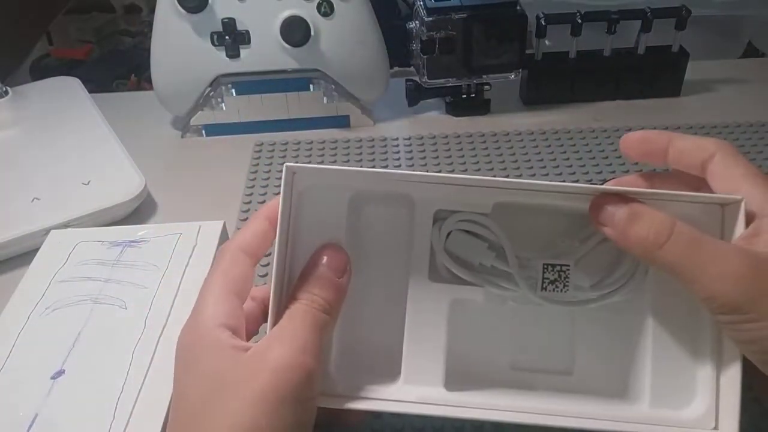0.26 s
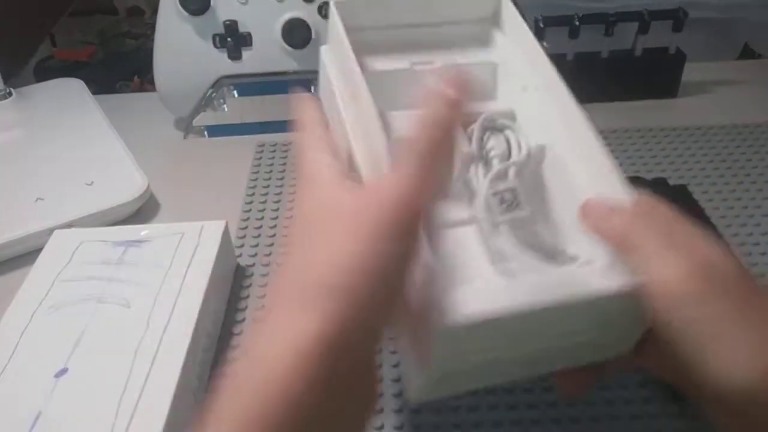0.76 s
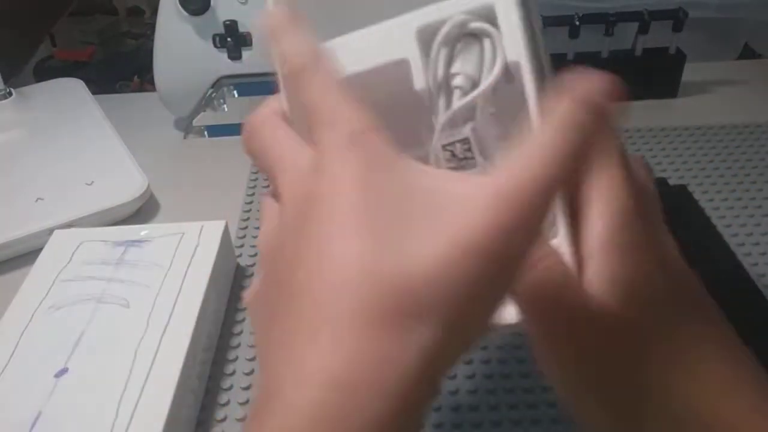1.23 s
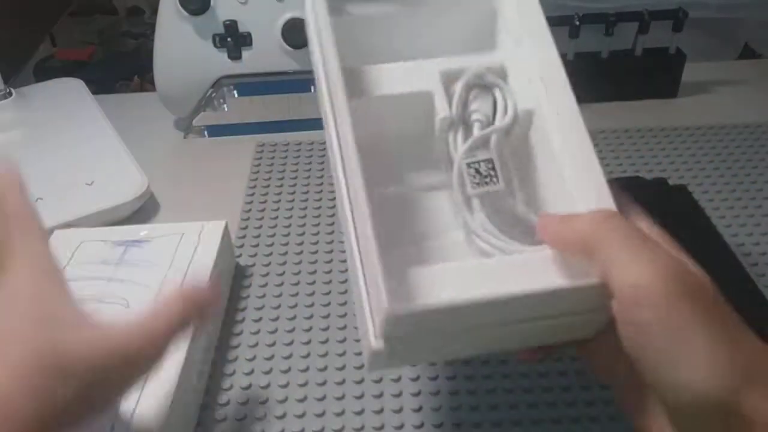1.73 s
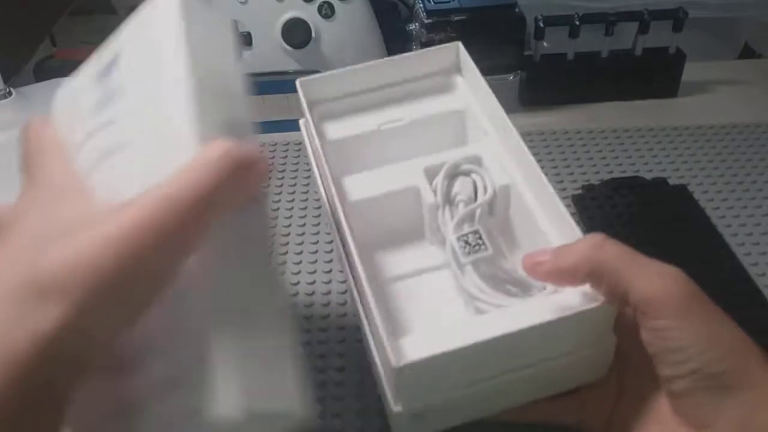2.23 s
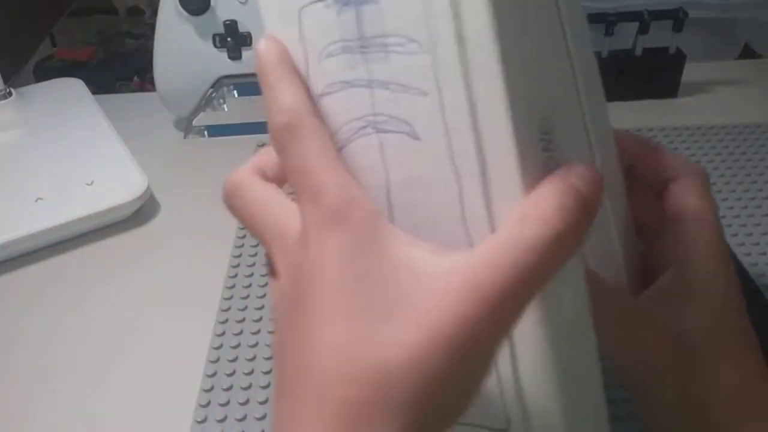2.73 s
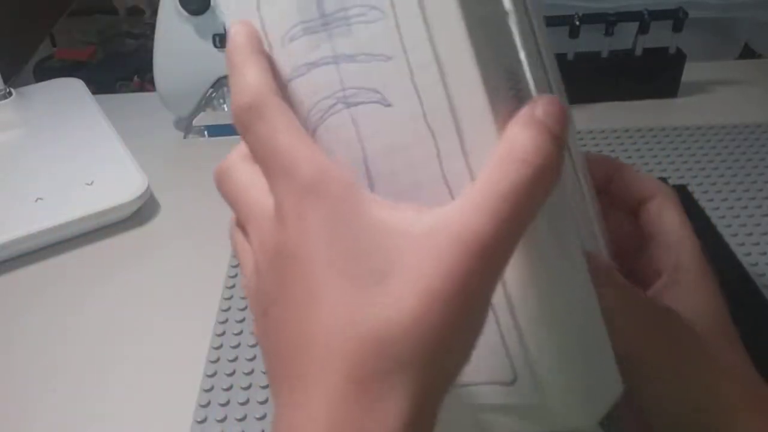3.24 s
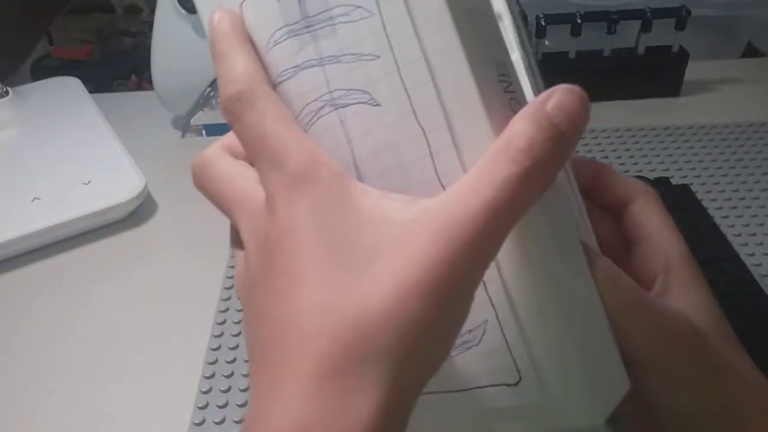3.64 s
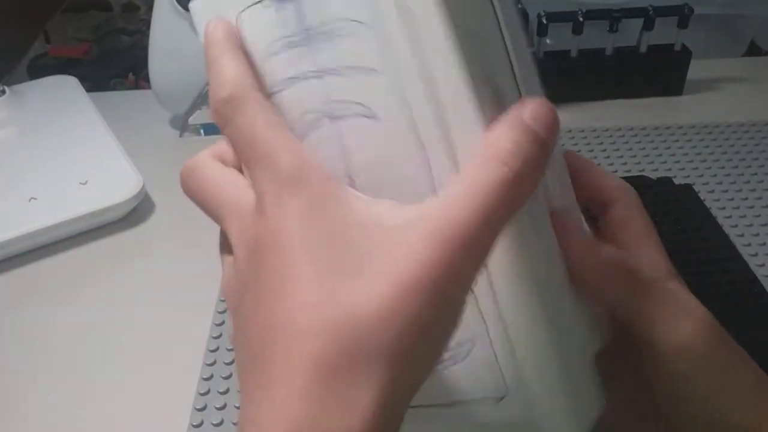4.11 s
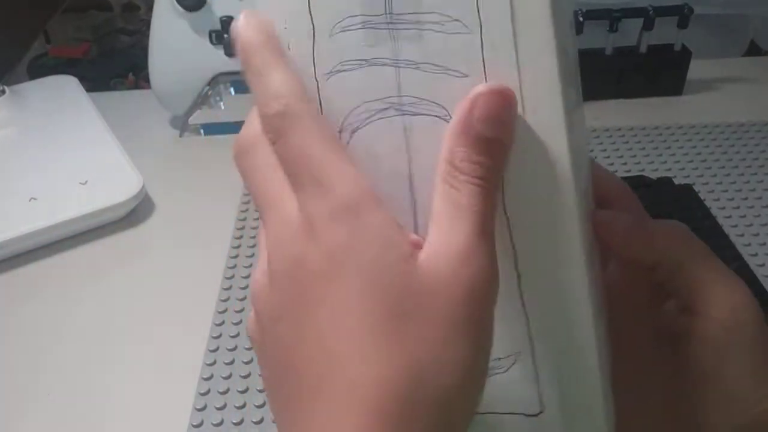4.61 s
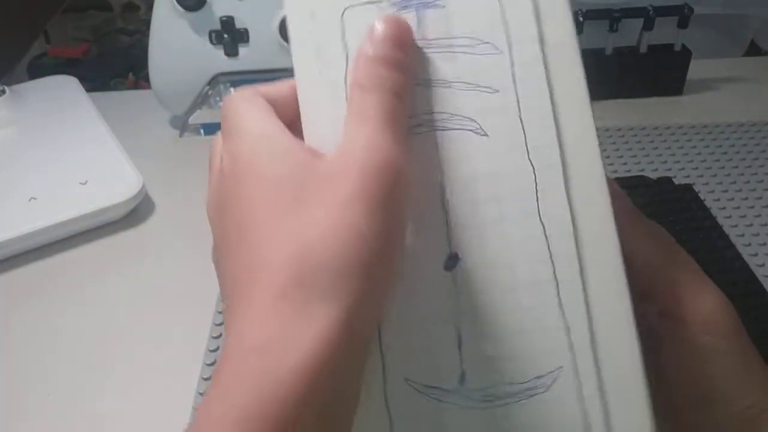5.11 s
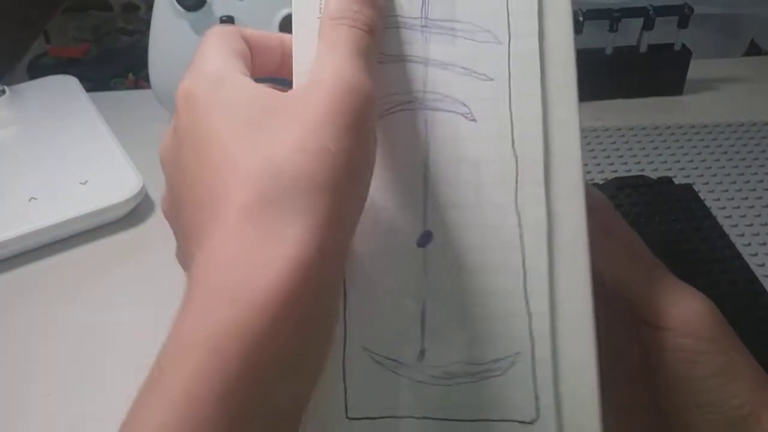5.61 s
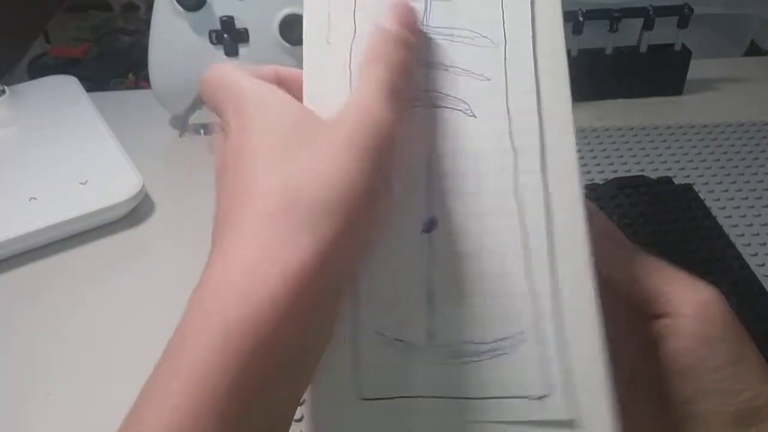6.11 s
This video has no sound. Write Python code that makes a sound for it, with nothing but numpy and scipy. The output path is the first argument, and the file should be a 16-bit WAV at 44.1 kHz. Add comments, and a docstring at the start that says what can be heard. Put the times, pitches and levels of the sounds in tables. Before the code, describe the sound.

Fingers brush and shift a rigid card box, heard closely and fairly dry indoors. Soft low bumps and papery rasps come first, then a firm hollow clunk on the table. A lull of light handling leads to clicky, woody lid knocks, brightest just before and after four seconds. Finally the snug lid rubs in muffled strokes with tiny crackles, its knocks getting lower in pitch, over a faint steady room tone.

```python
"""A faint low shudder, a soft thud and a tick are heard first, as hands turn a stiff cardboard box over.
They set it on a table and fit its lid, close by in a small room. Thuds, knocks and lid slips are struck modes:
sums of dying sines. Ticks and cracks are coloured noise bursts, and a squeak is a brief stick-slip oscillation.
Sliding skin and card are friction noise, filtered into hiss, rasp and drone.
The walls' ring drops in pitch as the lid sinks; still air lies beneath."""
import sys
import numpy as np
from scipy import signal
from scipy.io import wavfile
from scipy.ndimage import uniform_filter1d

SR = 44100
rng = np.random.default_rng(int(sys.argv[2]) if len(sys.argv) > 2 else 0)


def output_pcm(signal):
    """Save a mono or channel-first signal as 16-bit PCM at the path in sys.argv[1].

    Samples are clipped to [-1, 1] before scaling.
    """
    pcm = np.clip(np.atleast_2d(signal).T, -1, 1) * 32767
    wavfile.write(sys.argv[1], SR, np.round(pcm).astype(np.int16))


N = 280075
T = np.arange(SR // 4) / SR  # time axis of one short sound [s]

# Knocks on the box: (time [s], wall level [dB], hollow re wall [dB], crack re wall [dB])
KNOCK_EVENTS = [(0.457, -57, 7, -6), (1.0281, -64.5, 5, 13.5), (1.8604, -38, 1.5, -12.5),
                (1.872, -44, 4, -13), (1.953, -36, 0, -4.5), (1.967, -51, 15, -10), (2.863, -37, -5.5, -7),
                (2.8826, -49.5, -5.5, -19), (3.1645, -47.5, -13, -14), (3.298, -50, -20, -18),
                (3.316, -40.5, -6, -27), (3.8705, -36.5, -32, -1), (3.8972, -29, -6, -9),
                (3.908, -38, -4, -3), (3.9201, -36.5, -8, 0), (4.1801, -27, -2, -7.5),
                (4.258, -42.5, -5, -14), (4.2897, -45.5, 5.5, -7.5), (4.3384, -44, 4.5, -4.5),
                (4.4, -37.5, -8, -3), (4.757, -56, -8, -23), (4.884, -46.5, -27, -14),
                (4.904, -50, -28, -20), (5.111, -58.5, -29, -10), (5.323, -61.5, -11, -3),
                (5.538, -60.5, 8.5, -3), (5.7377, -43, -8, -9), (5.75, -42.5, -7, -15),
                (5.861, -51, -3, -1), (5.952, -48, 3, -17), (6.001, -53.5, 6, -3.5), (6.257, -43.5, -9, -5),
                (6.2882, -32.5, 0, -8)]
# Modes of the walls: (multiple of wall pitch [1], level [dB], undamped t60 [s])
WALL_MODES = [(.62, -1, 0.04), (.78, -1.5, 0.045), (.89, 3, 0.028), (1.0, 9.5, 0.09), (1.12, -7, .03),
              (1.56, -15, 0.052), (1.78, -20.5, 0.062)]
# Modes of the hollow: (multiple of hollow pitch [1], level [dB], undamped t60 [s])
HOLLOW_MODES = [(1.0, 0.5, 0.074), (1.32, 5, 0.009), (1.84, -5.5, 0.055)]
# Pitches of the box as the lid goes on and sinks: (time [s], wall pitch [Hz], hollow pitch [Hz])
BOX_PITCHES = [(1.86, 769, 312), (1.96, 730, 342), (2.86, 764, 264), (4.18, 754, 254), (4.26, 648, 254),
               (5.5, 587, 260), (5.95, 467, 249), (6.29, 440, 365.6)]
# Damping of a knock by the grip: (time [s], ring time factor [1])
GRIP_DAMPING = [(1.86, 0.87), (4.18, 0.68), (6.29, 0.73)]
# Spectrum of a crack: (frequency [Hz], level [dB])
CRACK_SPECTRUM = [(300, -22), (800, 7.5), (1200, 2.5), (1550, -1.5), (1800, -7.5), (2400, -6.5),
                  (3500, -19.5), (6600, -20), (8500, -29), (16000, -60)]

# Bumps of the box on the table or the palm: (time [s], level [dB], pitch [Hz])
THUD_EVENTS = [(0.127, -49.5, 159), (0.179, -48.5, 95), (0.456, -38.5, 126.4), (0.492, -37, 123),
               (1.031, -50, 141), (1.547, -47.5, 151), (1.614, -53, 107), (1.864, -34, 137),
               (1.955, -41, 115), (1.968, -32.5, 209), (2.159, -44, 131), (5.753, -48, 165),
               (5.863, -51, 126), (6.28, -35.5, 196)]
# Modes of the box on the table: (multiple of thud pitch [1], level [dB], t60 [s])
TABLE_MODES = [(.52, -23, 0.18), (.92, -3.5, 0.091), (1.05, 0.5, 0.044), (1.6, -7, 0.066),
               (2.4, -15, 0.035)]
# Drags of the shuddering box: (fastest time [s], speeding up [s], slowing down [s], level [dB])
DRAG_EVENTS = [(.03, 0.023, 0.12, -57), (.52, 0.2, 0.12, -51.5), (1.985, 0.017, 0.12, -66),
               (4.64, 0.37, 0.2, -66.5)]
# Spectrum of the dragged box: (frequency [Hz], level [dB])
SHUDDER_SPECTRUM = [(25, -14), (45, -10), (62, 2), (90, -18), (140, -3), (200, -12), (320, -27), (800, -39)]

# Catches of card edges and fingernails: (time [s], level [dB], pitch [Hz])
TICK_EVENTS = [(0.1216, -60.5, 7000), (0.447, -58, 3160), (0.495, -47, 6400), (0.5591, -47.5, 2200),
               (0.6285, -57, 6300), (0.883, -56, 3200), (0.9024, -57.5, 6460), (0.9475, -60.5, 7000),
               (1.0415, -57.5, 5190), (1.2965, -52.5, 3580), (1.5479, -48, 5200), (1.6075, -56, 6550),
               (2.6114, -45, 2020), (2.6435, -49, 2000), (2.685, -46.5, 2270), (2.7785, -51.5, 2400),
               (2.8639, -47.5, 2030), (3.1448, -52, 2220), (3.2979, -53, 6680), (3.849, -45, 5870),
               (3.8686, -39, 3430), (3.9, -34.5, 2950), (3.906, -41, 7100), (4.1264, -45, 3230),
               (4.157, -53, 4540), (4.1732, -45.5, 2150), (4.182, -48, 2400), (4.4, -69, 1140),
               (4.5465, -51.5, 2290), (5.0795, -61.5, 2270), (5.4395, -63, 2560), (5.4625, -64, 6600),
               (5.7506, -48.5, 2150), (5.864, -51, 2850), (6.256, -58, 1500), (6.2902, -58, 2540)]
# Spectrum of a tick's snap: (frequency [Hz], level [dB])
SNAP_SPECTRUM = [(500, 0), (1400, -12), (2500, -2.5), (4200, -4.5), (6800, 1), (8200, -22.5), (11000, -41),
                 (15500, -10)]
# Spectrum of the card's answer to a tick: (frequency [Hz], level [dB])
ANSWER_SPECTRUM = [(100, -17), (260, -0.5), (450, -19.5), (760, 0.5), (1100, -15), (1600, -6.5),
                   (2600, -29), (6000, -36.5)]
# Slips of the lid's rim over the box's edge: (time [s], level [dB], pitch [Hz])
SQUEAK_EVENTS = [(3.8737, -30, 3350)]
# Narrow resonances of the stiff card: (frequency [Hz], width [Hz], level [dB])
CARD_RESONANCES = [(925, 14, 0), (1150, 15, -2), (1205, 15, -3), (1600, 35, -4), (2318, 25, -3),
                   (3160, 60, -8), (3560, 70, -9)]

# Strokes of fingers over the card: (fastest time [s], length [s], level [dB])
BRUSH_EVENTS = [(0.413, 0.1, -65), (0.506, 0.17, -51), (0.674, 0.32, -60.5), (0.88, 0.18, -64.5),
                (1.064, 0.46, -61.5), (1.208, 0.083, -52.5), (1.287, 0.094, -53.5), (1.394, 0.16, -60.5),
                (1.53, 0.14, -62.5), (1.604, 0.042, -55.5), (1.913, 0.11, -70), (2.191, 0.23, -59.5),
                (2.706, 0.097, -53), (3.31, 0.33, -64), (3.72, 0.38, -70), (4.497, 0.32, -55),
                (4.752, 0.17, -63), (4.883, 0.14, -54.5), (4.967, 0.12, -53.5), (5.197, 0.075, -69.5),
                (5.393, 0.094, -63.5), (5.745, 0.11, -63), (6.214, 0.13, -54.5)]
# Scrapes of card on card or table:
# (fastest time [s], length [s], level [dB], drone re rasp [dB], contact pitch [Hz])
SCRAPE_EVENTS = [(0.513, 0.14, -48.5, -17, 1440), (0.572, 0.1, -46.5, -9, 1320),
                 (1.053, 0.046, -67, -11, 1000), (1.092, 0.18, -63, -0.5, 1010),
                 (1.271, 0.063, -53.5, -21, 900), (1.985, 0.097, -41.5, 4.5, 2730),
                 (2.012, 0.1, -47, 4, 2290), (2.071, 0.21, -57.5, -9, 944), (2.741, 0.18, -57, 0.5, 2500),
                 (2.878, 0.24, -63.5, -1, 3144), (3.173, 0.96, -67.5, -2, 2560),
                 (3.295, 0.087, -60, -5, 3480), (3.71, 0.29, -66.5, -14, 3500),
                 (3.887, 0.16, -42, -11, 3400), (4.142, 0.047, -50, -24, 3320),
                 (4.165, 0.095, -59.5, 19.5, 2400), (4.223, 0.36, -58, -8, 1210),
                 (4.433, 0.16, -75, 20.5, 623), (4.957, 0.32, -65.5, -26, 1620)]
# The lid worked down over the box: (time [s], drone level [dB])
LID_MOTION = [(4.8, -74), (5.08, -61.5), (5.34, -63), (5.44, -67.5), (5.53, -58), (5.62, -70.5),
              (5.68, -57.5), (5.8, -61.5), (5.865, -54), (5.92, -63.5), (5.98, -53.5), (6.1, -66),
              (6.22, -60), (6.285, -50), (6.35, -71)]
# Spectrum of friction heard through the box: (frequency [Hz], level [dB])
DRONE_SPECTRUM = [(40, -24), (80, -11.5), (160, -15), (320, 5.5), (480, -2.5), (700, 2), (950, -14),
                  (1500, -25.5), (4000, -50.5)]
# Spectrum of card rubbing: (frequency [Hz], level [dB])
RASP_SPECTRUM = [(300, -42.5), (700, 1), (1100, 0.5), (1700, 0), (2500, 0.5), (3400, -3.5), (4400, -6.5),
                 (7000, -8.5), (15000, -66)]
# Spectrum of skin rubbing: (frequency [Hz], level [dB])
HISS_SPECTRUM = [(1500, -37), (3500, -11), (4800, -3.5), (6000, -1.5), (6800, 3), (7600, -8.5),
                 (9000, -16.5), (11500, -15.5), (15500, -11)]

# Reverberation of the room: (frequency [Hz], t60 [s])
ROOM_DECAY = [(120, 0.53), (400, 0.26), (1000, 0.36), (3000, 0.29), (7000, 0.52), (15000, 0.028)]
# Spectrum of the still air: (frequency [Hz], level [dB])
AIR_SPECTRUM = [(15, -82), (25, -21), (92, -8), (175, -17.5), (195, -12.5), (335, -13.5), (451, -17),
                (641, -16.5), (714, -10), (1020, -18), (1230, -19.5), (1890, -23.5), (2840, -22.5),
                (5730, -32.5), (16000, -32)]

TICK_ANSWER_DB = -1.5  # card's answer re snap
RISE_SHARE, SWELL_DB = 0.49, 24  # part of a stroke spent speeding up; depth of its swell
BRUSH_RASP_DB, BRUSH_DRONE_DB, BRUSH_HZ = -6.5, -13, 6440  # re hiss; contact pitch
SCRAPE_HISS_DB = -6.5  # re rasp
LID_RASP_DB, LID_HISS_DB = -10, -11  # re the lid's drone
LID_SLIPS_PER_S, LID_SLIPS_DB = 31, -5.5  # mean rate; mean level re the lid's drone
AIR_DB = -70
EDGE_HZ = 15900  # upper band limit


def knocks(rattle_db=-13, rattle_t60=0.081):
    """Modal excitation: a knock rings hollow and walls; the lid shifts pitch, the grip damps, the tray rattles."""
    body, cracks = np.zeros(N), np.zeros(N)
    onset = rising(0.0015)
    for s, db, hollow_db, crack_db in KNOCK_EVENTS:
        wall_hz, hollow_hz = follow(BOX_PITCHES, s)
        (length,) = follow(GRIP_DAMPING, s)
        hollow = blow(onset * ring(HOLLOW_MODES, hollow_hz, length))
        wall = blow(onset * ring(WALL_MODES, wall_hz, length))
        rattle_noise = T * amp(-60 * T / rattle_t60) * rng.standard_normal(len(T))
        rattle = blow(colour(rattle_noise, DRONE_SPECTRUM))
        add(body, s, amp(db) * (wall + amp(rattle_db) * rattle + amp(hollow_db) * hollow))
        crushing = onset * burst(t60=0.0045, after_db=-17.5, after_t60=0.049)
        crack = blow(colour(crushing, CRACK_SPECTRUM), seconds=0.0076)
        add(cracks, s, amp(db + crack_db) * crack)
    return body + card(cracks)


def thuds():
    """Low-mode excitation: soft, heavy contacts rock the box on the table; dragging makes it shudder."""
    out = np.zeros(N)
    onset = rising(0.00043)
    shudder = evened(colour(rng.standard_normal(N), SHUDDER_SPECTRUM))
    for s, db, hz in THUD_EVENTS:
        thud = blow(onset * ring(TABLE_MODES, hz, length=1.0), seconds=0.0063)
        add(out, s, -amp(db) * thud)
    for s, before, after, db in DRAG_EVENTS:
        speed = swell(before, after, depth_db=25)
        add(out, s - before, amp(db) * during(shudder, s - before, speed))
    return out


def slides():
    """Sliding friction: brushes mostly hiss on skin, scrapes rasp on card, the sinking lid drones in the box."""
    drone_rub = friction(N, per_s=220, spread_db=-2.0, smooth=0.82, judder_db=2.5)
    rasp_rub = friction(N, per_s=2000, spread_db=2.5, smooth=1.0, judder_db=1.2)
    hiss_rub = friction(N, per_s=2700, spread_db=-0.5, smooth=0.96, judder_db=1.16)
    drone = patchy(colour(drone_rub, DRONE_SPECTRUM), depth_db=7)
    rasp = patchy(colour(rasp_rub, RASP_SPECTRUM), depth_db=3)
    hiss = patchy(colour(hiss_rub, HISS_SPECTRUM), depth_db=5.0)

    t = np.arange(N) / SR
    lid_gain = amp(follow(LID_MOTION, t)[0]) * (t > LID_MOTION[0][0])
    out = lid_gain * (drone + amp(LID_RASP_DB) * rasp + amp(LID_HISS_DB) * hiss)

    brush_rub = hiss + amp(BRUSH_RASP_DB) * rasp
    brush_drone = amp(BRUSH_DRONE_DB) * drone
    for s, length, db in BRUSH_EVENTS:
        start, sound = stroke(brush_rub, brush_drone, s, length, BRUSH_HZ)
        add(out, start, amp(db) * sound)

    scrape_rub = rasp + amp(SCRAPE_HISS_DB) * hiss
    for s, length, db, drone_db, hz in SCRAPE_EVENTS:
        start, sound = stroke(scrape_rub, amp(drone_db) * drone, s, length, hz)
        add(out, start, amp(db) * sound)
    return card(out)


def lid_slips(spread_db=3, crack_db=-6, step_s=.005):
    """Random stick-slip: the tight lid slips at chance moments, each a tiny crack and a knock on the walls."""
    out = np.zeros(N)
    onset = rising(0.00061)
    times = np.arange(LID_MOTION[0][0], N / SR, step_s)
    crushing = onset * burst(t60=.005, after_db=-15, after_t60=.04)
    crack = blow(colour(crushing, CRACK_SPECTRUM), seconds=0.0059)
    for s, (chance, size, spot) in zip(times, rng.random((len(times), 3))):
        if chance < LID_SLIPS_PER_S * step_s:
            wall_hz, _ = follow(BOX_PITCHES, s)
            db = follow(LID_MOTION, s)[0] + LID_SLIPS_DB + spread_db * (2 * size - 1)
            wall = blow(onset * ring(WALL_MODES, wall_hz * (0.908 + .2 * spot), length=1.0))
            add(out, s, amp(db) * (wall + amp(crack_db) * crack))
    return out


def ticks(pitch_width_hz=700, pitch_db=3):
    """Sudden release: an edge snaps free in a click with one broad pitch, and the card answers."""
    out = np.zeros(N)
    onset = rising(0.00021)
    for s, db, hz in TICK_EVENTS:
        snap = colour(onset * burst(t60=0.012, after_db=-11.0, after_t60=0.08), SNAP_SPECTRUM)
        snap = snap + amp(pitch_db) * resonate(snap, hz, pitch_width_hz)
        answer = colour(onset * burst(t60=0.085, after_db=-21.0, after_t60=0.0196), ANSWER_SPECTRUM)
        tick = blow(snap, seconds=0.0071) + amp(TICK_ANSWER_DB) * blow(answer, seconds=0.0065)
        add(out, s, amp(db) * tick)
    return card(out)


def squeaks(width_s=0.00052, overtone_db=-17, grit_db=-16):
    """Stick-slip oscillation: a few cycles sound as the rim jumps the edge."""
    out = np.zeros(N)
    t = T - .01  # zero at the loudest moment
    for s, db, hz in SQUEAK_EVENTS:
        phase = 2 * np.pi * hz * t
        grit = amp(grit_db) * rng.standard_normal(len(t))
        slip = np.sin(phase) + amp(overtone_db) * np.sin(2 * phase) + grit
        add(out, s + t[0], amp(db) * blow(slip * np.exp(-abs(t) / width_s)))
    return card(out)


def ring(modes, hz, length):
    """Modal superposition: dying sines of a struck body, neighbouring modes swinging in opposite senses."""
    out = np.zeros(len(T))
    for i, (multiple, db, t60) in enumerate(modes):
        decay = amp(db - 60 * T / (t60 * length))
        out += (-1) ** i * decay * np.sin(2 * np.pi * hz * multiple * T)
    return out


def rising(seconds):
    """Exponential approach: a contact builds up with this time constant."""
    return 1 - np.exp(-T / seconds)


def burst(t60, after_db, after_t60):
    """Two-stage decay: fibres crush in a short burst, and the card chatters on more softly."""
    fade = amp(-60 * T / t60) + amp(after_db) * amp(-60 * T / after_t60)
    return fade * rng.standard_normal(len(T))


def friction(size, per_s, spread_db, smooth, judder_db):
    """Asperity friction: many tiny uneven slips over a smooth rub, while the grip judders."""
    happens = rng.random(size) < per_s / SR
    heights = amp(spread_db * np.minimum(rng.exponential(1, size), 3))
    slips = happens * heights * rng.choice([-1, 1], size)
    wander = uniform_filter1d(rng.standard_normal(size), size=260)
    judder = evened(uniform_filter1d(wander, size=130))
    return (evened(slips) + smooth * rng.standard_normal(size)) * amp(judder_db * judder)


def patchy(x, depth_db):
    """Changing contact: the touching spots shift the colour in patches of some 400 Hz by 25 ms."""
    z = signal.stft(x, nperseg=512, noverlap=384)[2]
    spots = uniform_filter1d(rng.standard_normal(z.shape), size=5, axis=0)  # along frequency
    spots = evened(uniform_filter1d(spots, size=9, axis=1))  # along time
    return evened(signal.istft(z * amp(depth_db * spots), nperseg=512, noverlap=384)[1][:N])


def stroke(rub, drone, s, length, hz, contact_db=0, contact_width_hz=450):
    """Contact resonance: a stroke swells and fades, its rub favouring one pitch. Gives start and sound."""
    before = length * RISE_SHARE
    start = s - before
    speed = swell(before, length - before, depth_db=SWELL_DB)
    rub, drone = during(rub, start, speed), during(drone, start, speed)
    pitched = rub + amp(contact_db) * resonate(rub, hz, contact_width_hz)
    return start, np.std(rub) * evened(pitched) + drone


def swell(rise, fall, depth_db):
    """Speed and loudness: a movement speeds up to its peak and slows down again."""
    up = np.linspace(-depth_db, 0, int(rise * SR) + 1)
    down = np.linspace(0, -depth_db, int(fall * SR) + 1)
    db = np.concatenate([up, down])
    return amp(db) * signal.windows.tukey(len(db), .2)  # the ends taper to silence


def during(x, s, speed):
    """Amplitude modulation: a running sound from time s on, under a movement's envelope."""
    part = x[max(round(s * SR), 0):][:len(speed)]
    return part * speed[:len(part)]


def card(x):
    """Parallel resonance: the card's own modes ring on top of whatever touches it."""
    return x + sum(amp(db) * resonate(x, hz, width) for hz, width, db in CARD_RESONANCES)


def resonate(x, hz, width):
    """Second-order resonance with gain 1 at its peak."""
    return signal.lfilter(*signal.iirpeak(hz, hz / width, fs=SR), x)


def colour(x, points, size=4096):
    """Minimum-phase filtering: a causal filter with the given spectrum."""
    log_gain = np.log(amp(read(points, abs(np.fft.fftfreq(size, 1 / SR)))))
    spectrum = np.exp(np.conj(signal.hilbert(log_gain)))
    taps = np.fft.ifft(spectrum).real[:size // 2]
    return signal.fftconvolve(x, taps)[:len(x)]


def read(points, hz):
    """Logarithmic interpolation: a table's value at hz on a log-frequency axis."""
    f, value = np.transpose(points)
    return np.interp(np.log(hz + 1), np.log(f + 1), value)


def follow(curve, s):
    """Linear interpolation: a curve's columns at time s."""
    times, *columns = np.transpose(curve)
    return [np.interp(s, times, column) for column in columns]


def amp(db):
    """Level and amplitude: decibels to gain."""
    return 10 ** (np.asarray(db) / 20)


def evened(x):
    """Power normalisation: scales to rms 1."""
    return x / np.sqrt(np.mean(x ** 2) + 1e-20)


def blow(x, seconds=0.013):
    """Energy normalisation: gives a short sound the energy of rms 1 held for a moment."""
    return x * np.sqrt(seconds * SR / (np.sum(x ** 2) + 1e-20))


def add(mix, s, sound):
    """Superposition: mixes a sound in at time s."""
    part = mix[max(round(s * SR), 0):][:len(sound)]
    part += sound[:len(part)]


def room(x, wet_db=-17):
    """Reverberation: sparse reflections of random sign, each band dying at its own speed."""
    taps = rng.choice([-1., 1.], SR // 2) * (rng.random(SR // 2) < 4000 / SR)
    taps[:SR // 150] = 0  # gap before the first reflection
    hz, t, z = signal.stft(taps, SR, nperseg=256)
    decay = amp(-60 * t / read(ROOM_DECAY, hz)[:, None])
    tail = signal.istft(z * decay, SR, nperseg=256)[1]
    return x + amp(wet_db) * signal.fftconvolve(x, tail / np.linalg.norm(tail))[:N]


def still_air():
    """Stationary noise: a steady coloured background."""
    return amp(AIR_DB) * evened(colour(rng.standard_normal(N), AIR_SPECTRUM))


def scene(ring_db=-33, ring_air_db=-1):
    """Superposition: the handling in its room, the still air, and one narrow ring of the surroundings."""
    mix = room(knocks() + thuds() + slides() + lid_slips() + ticks() + squeaks())
    air = still_air()
    ringing = resonate(amp(ring_db) * mix + amp(ring_air_db) * air, hz=742.0, width=11)
    return (mix + air + ringing)[None]


def record(dry, low_cut_hz=52):
    """Band limitation: a low cut and a steep upper edge."""
    low_cut = signal.butter(3, low_cut_hz, "highpass", fs=SR, output="sos")
    dry = signal.sosfilt(low_cut, dry)
    edge = signal.firwin(511, EDGE_HZ, window=("kaiser", 8), fs=SR)
    return signal.oaconvolve(dry, edge[None], "same")


dry = scene()
out = record(dry)
output_pcm(out)
```